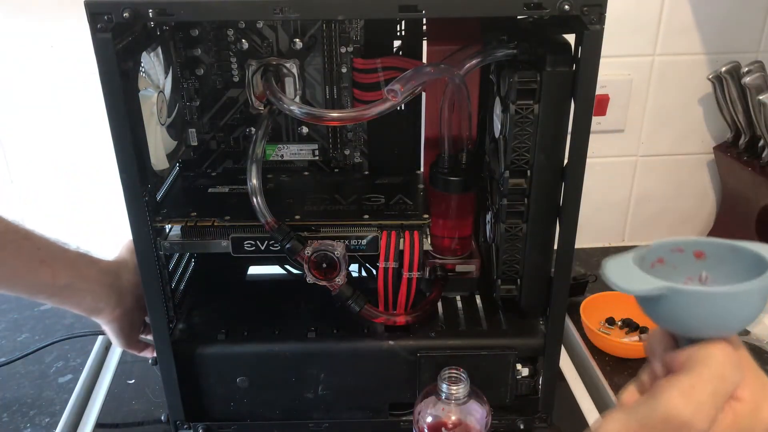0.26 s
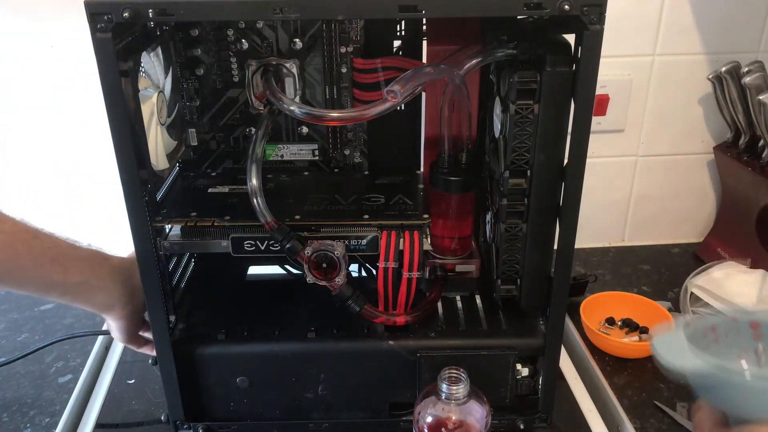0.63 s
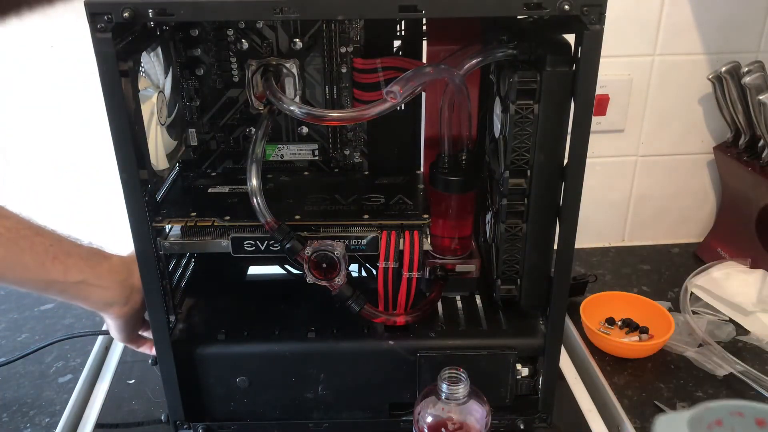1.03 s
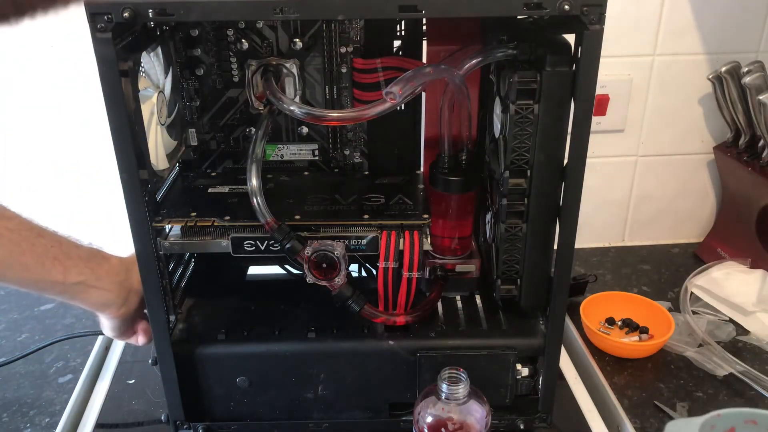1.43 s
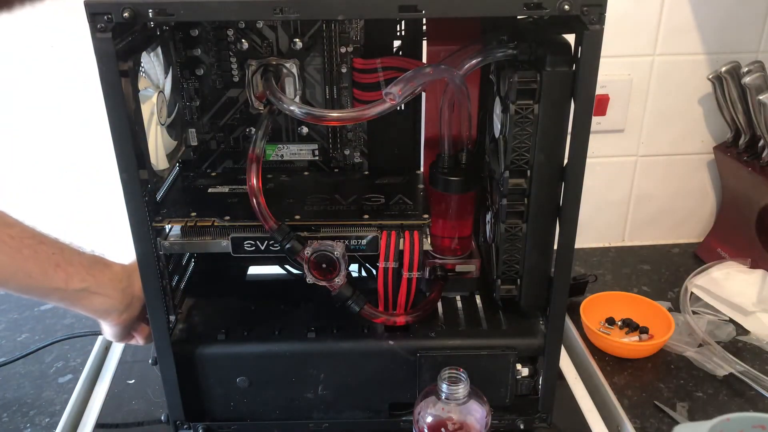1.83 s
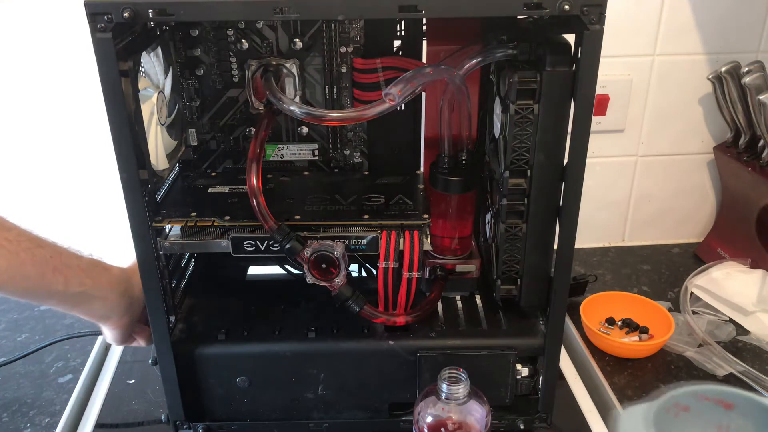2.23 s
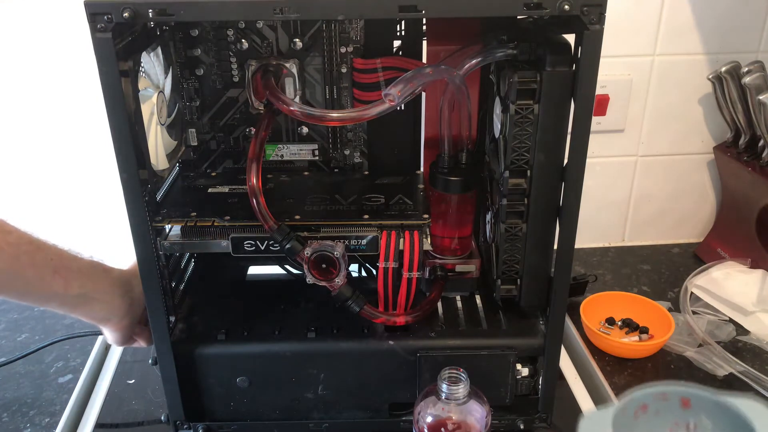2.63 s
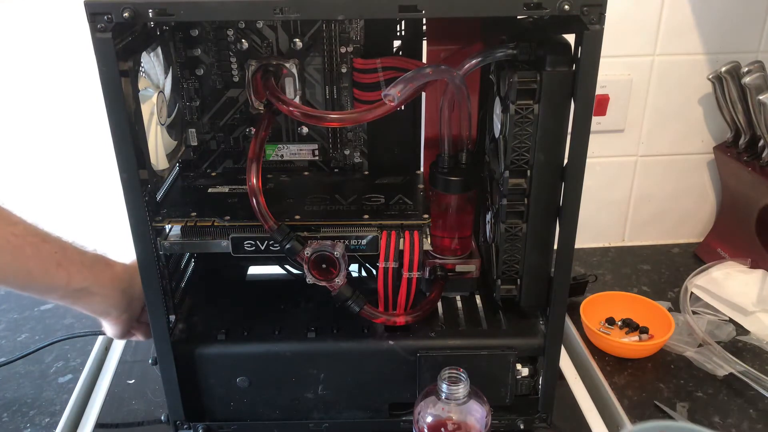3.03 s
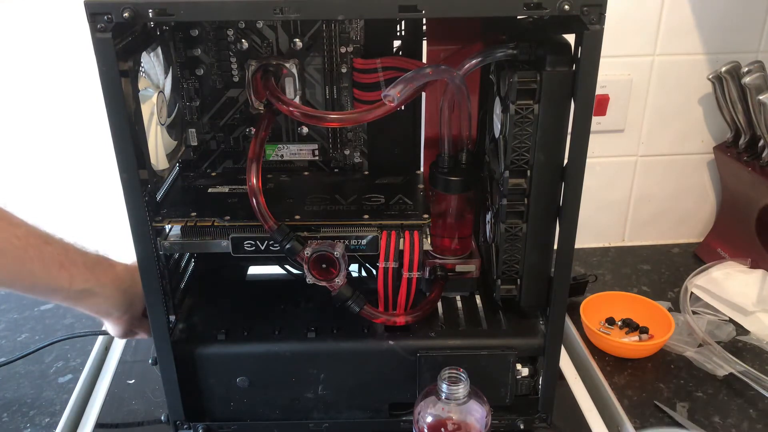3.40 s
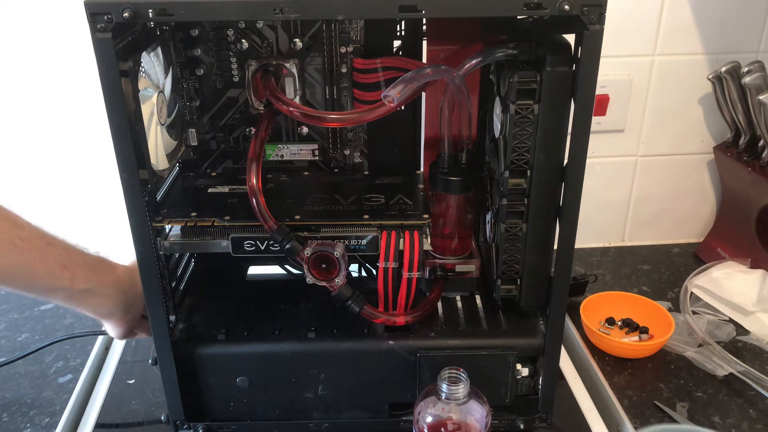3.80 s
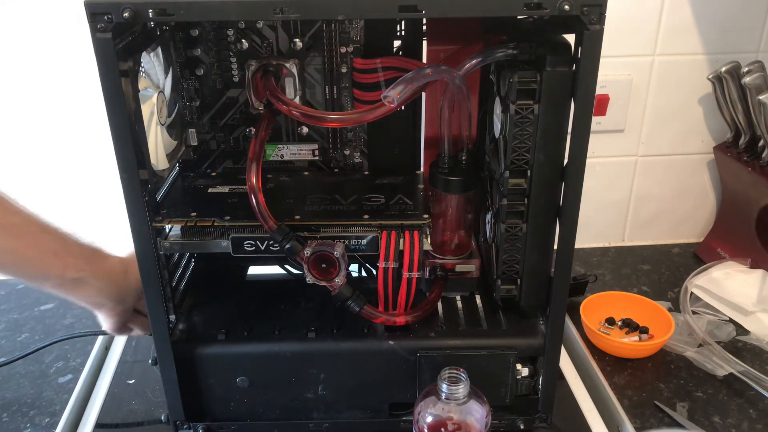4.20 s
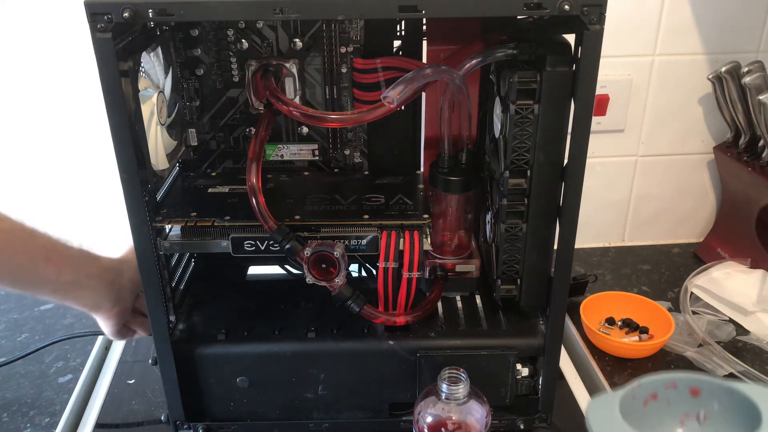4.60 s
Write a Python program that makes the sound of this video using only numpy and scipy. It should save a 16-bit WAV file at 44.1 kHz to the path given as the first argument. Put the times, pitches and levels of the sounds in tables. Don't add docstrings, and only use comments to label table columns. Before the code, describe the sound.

A switch snaps, hollow plastic knocks and rocks on a counter, then a small pump crackles with air bubbles, snaps off and rattles to a stop.

```python
import sys
import numpy as np
from scipy import signal
from scipy.fft import rfft, irfft, next_fast_len
from scipy.io import wavfile
from scipy.ndimage import map_coordinates

SR = 44100
rng = np.random.default_rng(int(sys.argv[2]) if len(sys.argv) > 2 else 0)


def volts_from_db(level):
    exponent = np.asarray(level, float) / 20
    return 10 ** exponent


def wav_out(sig):
    wavfile.write(sys.argv[1], SR, np.round(np.clip(np.atleast_2d(sig).T, -1, 1) * 32767).astype(np.int16))


N = 213976

# time [s], churn level [dB], slosh in the reservoir [dB].
CHURN_COURSE = [(1.7, -71.5, 8.5), (2.02, -65, 5.5), (2.09, -58, 2), (2.22, -58, 2), (2.26, -54, 4.5),
                (2.36, -58.5, -3), (2.5, -52, 4), (2.71, -48, 1.5), (2.8, -48.5, -1), (3.21, -46, -0.5),
                (3.57, -44.5, -2), (3.8, -44, 1), (4.1, -43, 1.5), (4.2, -39.5, 2.5), (4.316, -39.5, -10),
                (4.47, -43.5, -6.5), (4.62, -59.5, -7), (4.85, -70.5, -6)]
# centre [Hz], width [Hz], level [dB].
HOUSING_MODES = [(1033, 120, -8.5), (1570, 410, -6), (1930, 200, 0.5), (2160, 290, -2.5), (2960, 130, 3),
                 (3270, 100, 2.5), (3540, 220, -2), (4380, 270, -1)]


def unit(x):
    return x / np.sqrt(np.mean(x ** 2) + 1e-20)


def along(points, hz):
    f, v = np.transpose(points)
    return np.interp(np.log(hz + 1), np.log(f + 1), v)


def ramp(times_s, values):
    return np.interp(np.arange(N) / SR, times_s, values)


def curves(rows):
    s, *cols = np.transpose(rows)
    return [ramp(s, c) for c in cols]


def wobble(rate):
    knots = rng.standard_normal(int(N * rate / SR) + 4)
    return map_coordinates(knots, [np.arange(N) * rate / SR])


def filtered(x, response):
    m = next_fast_len(len(x) + 8192)
    return irfft(rfft(x, m) * response(np.fft.rfftfreq(m, 1 / SR)), m)[:len(x)]


def modes(table):
    def response(f):
        total = 0
        for k, (c, w, db) in enumerate(table):
            total = total + (-1) ** k * volts_from_db(db) * 1j * f * w / (c * c - f * f + 1j * f * w)
        return total
    return response


def steep(table):
    return lambda f: sum(volts_from_db(db) * modes([(c, 1.55 * w, 0)])(f) ** 2 for c, w, db in table)


def causal(spectrum):
    def response(f):
        cep = irfft(np.log(volts_from_db(along(spectrum, f)) + 1e-6))
        cep[1:len(f) - 1] *= 2
        cep[len(f):] = 0
        return np.exp(rfft(cep))
    return response


def roomy(x, wet_db, drive=None):
    # frequency [Hz], t60 [s].
    kitchen_t60 = [(200, 0.25), (1000, 0.35), (3000, 0.32), (6000, 0.32), (10000, 0.27), (16000, 0.2)]
    hz, t, z = signal.stft(rng.standard_normal(SR // 3), SR, nperseg=256)
    decay = volts_from_db(-60 * t / along(kitchen_t60, hz)[:, None])
    tail = signal.istft(z * decay, SR, nperseg=256)[1]
    tail = np.pad(tail / np.linalg.norm(tail), (round(.004 * SR), 0))
    wet = signal.fftconvolve(x if drive is None else drive, tail)
    return np.pad(x, (0, len(tail) - 1)) + volts_from_db(wet_db) * wet


def add(track, s, piece):
    part = track[round(s * SR):][:len(piece)]
    part += piece[:len(part)]


def puff(t60, rise=0.00021):
    t = np.arange(SR // 8) / SR
    burst = rng.standard_normal(SR // 8) * volts_from_db(-60 * t / t60) * (1 - np.exp(-t / rise))
    return burst / np.linalg.norm(burst)


def grains(per_s, spread_db, clump):
    draw = rng.random((N, 3))
    hit = draw[:, 0] < per_s / SR * np.exp(clump * wobble(30))
    size = volts_from_db(np.minimum(-spread_db * np.log(draw[:, 2]), 9))
    return unit(hit * np.sign(draw[:, 1] - .5) * size)


def bubbles(per_s, centre_hz, octaves, cycles, spread_db):
    at = np.flatnonzero(rng.random(N) < per_s / SR * np.exp(.45 * wobble(35)))
    draw, t = rng.random((len(at), 2)), np.arange(220) / SR
    hz = np.clip(centre_hz * 2 ** (octaves * rng.standard_normal(len(at))), 600, 13500)[:, None]
    size = volts_from_db(np.minimum(-spread_db * np.log(draw[:, :1]), 12))
    envelope = np.exp(-t * hz / cycles) * (1 - np.exp(-t * hz))
    wave = size * np.sin(2 * np.pi * hz * t * (1 + 20 * t)) * envelope
    place = at[:, None] + np.arange(220)
    return unit(np.bincount(place.ravel(), wave.ravel(), N + 220)[:N])


def fine_foam(knocks):
    # frequency [Hz], level [dB per Hz].
    foam_colour = [(2650, -9.5), (4500, -4.5), (5060, -8), (6460, -5.5), (6920, -6.5), (7650, -12.5),
                   (9070, -10), (10600, -14.5), (13700, -18.5), (14900, -18.5), (16000, -37.5)]
    fade_s = (4.52, 4.65)
    spray = bubbles(per_s=630, centre_hz=7600, octaves=0.483, cycles=2.0, spread_db=5.5)
    spit = 0.35 * knocks + 0.5 * spray + rng.standard_normal(N)
    fizz = unit(roomy(filtered(spit, causal(foam_colour)), wet_db=-11.0)[:N])
    lone = bubbles(per_s=45, centre_hz=10000, octaves=0.48, cycles=9, spread_db=3.5)
    return volts_from_db(-5 + ramp(fade_s, [0, -11])) * (fizz + 0.16 * lone)


def reservoir(churn_db, slosh_db):
    # centre [Hz], width [Hz], level [dB].
    chamber_modes = [(535.3, 68, 0.5), (920, 270, -13.5)]
    # centre [Hz], width [Hz], level [dB].
    neck_modes = [(656, 71, 0)]
    # centre [Hz], width [Hz], level [dB].
    panel_modes = [(90.6, 26, 3.5), (174, 58, -13.5)]
    drain_s = (3.4, 3.8)
    gulp_db = 2.5 * wobble(11)
    chamber_db = -21.5 + .8 * churn_db + slosh_db - 0.28 * gulp_db
    inlet_db = -36 + .6 * churn_db + 0.14 * slosh_db + gulp_db
    stir = volts_from_db(0.57 * wobble(25)) * rng.standard_normal(N)
    drained = ramp(drain_s, [0, .65]) * unit(filtered(stir, modes([(498, 26, 0)])))
    slosh = unit(filtered(stir, steep(chamber_modes))) + drained
    boom = unit(filtered(volts_from_db(2.4 * wobble(21)) * rng.standard_normal(N), modes(panel_modes)))
    gurgle = unit(filtered(volts_from_db(3.2 * wobble(22.06)) * rng.standard_normal(N), steep(neck_modes)))
    return volts_from_db(inlet_db + 2.5) * gurgle + volts_from_db(chamber_db + 0.2) * slosh + volts_from_db(0.64 * chamber_db - 33) * boom


def flow():
    churn_db, slosh_db = curves(CHURN_COURSE)
    knocks = grains(per_s=800, spread_db=1.5, clump=.45) + 0.64 * rng.standard_normal(N)
    pockets = bubbles(per_s=400, centre_hz=2940, octaves=0.48, cycles=2.2, spread_db=1.5)
    housing = unit(filtered(knocks, modes(HOUSING_MODES)))
    crackle = unit(roomy(housing + 0.535 * pockets, wet_db=-2.5)[:N])
    torn = volts_from_db(churn_db) * (volts_from_db(-3.0) * crackle + fine_foam(knocks))
    return ramp([1.6, 1.75], [0, 1]) * (torn + reservoir(churn_db, slosh_db))


def pops():
    # time [s], peak [dB], ring [Hz].
    thuds = [
        (0.086, -49.5, 157),
        (0.714, -51, 212),
        (1.227, -56, 410),
        (1.425, -49.5, 446),
        (1.78, -60, 70.5),
        (2.235, -57, 91),
        (2.63, -56.5, 90),
        (2.74, -58, 99),
        (3.23, -60, 86),
        (3.85, -54, 160),
    ]
    # time [s], peak [dB], ring [Hz].
    first_ticks = [(1.404, -46, 5500), (1.4235, -42, 2330), (1.4242, -37.5, 5920), (1.4255, -42.5, 3740),
                   (1.638, -52, 2200), (1.642, -48, 5760), (1.71, -58, 11000), (1.791, -58, 3270),
                   (1.862, -52, 8260), (1.92, -56, 1990), (1.966, -59, 8900)]
    # time [s], peak [dB], ring [Hz].
    large_pockets = [(1.9818, -48, 4260), (2.0184, -48, 3560), (2.039, -47, 3420), (2.089, -46, 2450),
                     (2.1339, -36.5, 2080), (2.204, -45, 6400), (2.2296, -42, 4380), (2.2686, -48, 3200),
                     (2.3081, -48, 4600), (2.4216, -43, 3020), (2.4451, -42.5, 2160), (2.459, -39.5, 4500),
                     (2.4975, -42.5, 1670), (2.5331, -36, 3000), (2.6455, -39.5, 2990), (2.68, -39.5, 1930),
                     (2.706, -37.5, 3040), (2.7523, -35.5, 2090), (2.7664, -37.5, 4500),
                     (2.875, -38.5, 3130), (3.0114, -34, 2960), (3.0291, -36, 3180), (3.083, -39, 3040),
                     (3.1738, -38.5, 2000), (3.2044, -38, 2140), (3.258, -37, 2900), (3.3175, -41, 4350),
                     (3.361, -31, 3130), (3.749, -36, 5700), (3.7755, -37, 6500)]
    # time [s], peak [dB], ring [Hz].
    coasting_knocks = [(4.1993, -28.5, 3990), (4.2144, -35, 2100), (4.3113, -32.5, 2960),
                       (4.3893, -29.5, 4570), (4.4182, -33.5, 3040), (4.459, -36, 6100),
                       (4.5343, -53, 6050), (4.5892, -59, 5800), (4.6591, -49.5, 3780), (4.761, -44, 3670),
                       (4.762, -51, 5260), (4.789, -49.5, 4335), (4.8444, -47.5, 2910)]
    # time [s], peak [dB].
    dull_bursts = [
        (2.0184, -50),
        (2.3083, -47),
        (2.378, -49),
        (2.5329, -48),
        (2.601, -49),
        (2.7525, -44),
        (2.9232, -41.5),
        (3.7751, -43),
        (3.797, -43),
    ]
    crack_share = 0.39
    out, churn_db = np.zeros(N), curves(CHURN_COURSE)[0]

    def splash(f):
        return modes([(5000, 7500, 0)])(f) ** 4 + .8 * modes(HOUSING_MODES)(f)

    for s, db, hz in thuds + first_ticks + large_pockets + coasting_knocks:
        ring = filtered(puff(0.022, rise=0.0015), lambda f: modes([(hz, .2 * hz, 0)])(f) ** 2)
        crack = filtered(puff(0.0086), splash) * (hz > 1000)
        crack_db = 7.5 + (1 - crack_share) * (churn_db[round(s * SR)] - db)
        pop = ring / np.abs(ring).max() + volts_from_db(crack_db) * crack / (np.abs(crack).max() + 1e-9)
        add(out, s, volts_from_db(db - 1) * roomy(pop, wet_db=-3.5))
    for s, db in dull_bursts:
        crack = filtered(puff(0.01), steep([(5400, 4700, 0)]))
        add(out, s, volts_from_db(db + 7.5) * roomy(crack / np.abs(crack).max(), wet_db=-6))
    return out


def rotor():
    # centre [Hz], width [Hz], level [dB].
    bearing_modes = [(5700, 630, 3), (6600, 530, 1), (7050, 390, -4), (9500, 520, -17)]
    # time [s], level [dB].
    kicks = [
        (4.534, -64),
        (4.66, -63),
        (4.762, -62),
    ]
    t, loudest_s = np.arange(N) / SR, 4.468
    swell_db, stall_db = 35 * (loudest_s - t), 169 * (t - loudest_s)
    loose = volts_from_db(-41 - np.maximum(swell_db, stall_db)) * ramp([4.27, 4.36], [0, 1])
    for s, db in kicks:
        loose = loose + (t > s) * volts_from_db(db - 60 * np.abs(t - s) / 0.098)
    chatter = grains(per_s=570, spread_db=14, clump=0.78) + 0.27 * rng.standard_normal(N)
    rattle = unit(roomy(filtered(chatter, modes(bearing_modes)), wet_db=-4.5)[:N])
    return loose * volts_from_db(-3.5) * rattle


def hum(table, start_s, stop_s, cog_depth=0):
    hz, db = curves(table)
    t = np.arange(N) / SR
    gate = ramp([start_s - .03, start_s, stop_s, stop_s + .04], [0, 1, 1, 0])
    cog = 1 + cog_depth * np.cos(2 * np.pi * 14 * (t - 1.536))
    turn = 2 * np.pi * np.cumsum(hz) / SR
    return gate * cog * volts_from_db(db + 0.62 * wobble(29.57)) * (np.sin(turn) + 0.034 * np.sin(2 * turn))


def windings():
    # time [s], pitch [Hz], level [dB].
    groan = [
        (1.42, 161.2, -65),
        (1.536, 205.4, -53),
        (1.614, 241.5, -52),
        (1.68, 233.5, -55.5),
        (1.76, 230, -70),
    ]
    # time [s], pitch [Hz], level [dB].
    rundown = [
        (4.25, 291, -90),
        (4.32, 300.6, -57),
        (4.5, 296, -67.5),
        (4.7, 291, -74),
        (4.76, 295, -89),
    ]
    return hum(groan, 1.41, 1.75, cog_depth=0.68) + hum(rundown, 4.25, 4.76)


def supply():
    # frequency [Hz], level [dB].
    coil_squeal = [(1600, -74), (5210, -77), (5600, -85), (6000, -80.5), (6400, -88.5), (8400, -79)]
    t, squeal = np.arange(N) / SR, np.zeros(N)
    for hz, db in coil_squeal:
        squeal += volts_from_db(db + 2 * wobble(60)) * np.sin(2 * np.pi * hz * t + .8 * wobble(60))
    charging = ramp([1.11, 1.13, 1.22, 1.27], [0, 1, 1, 0])
    return charging * squeal + volts_from_db(-87) * np.sin(2 * np.pi * 10492 * t)


def driver():
    # time [s], level [dB], load [0-1].
    whistle = [
        (1.45, -100, 0),
        (1.47, -69.5, 0.5),
        (1.7, -64.5, 0.4),
        (2.03, -61, 0.3),
        (2.15, -63, 0.7),
        (2.62, -65, .85),
        (2.75, -76, .5),
        (3.0, -61, .4),
        (3.2, -76, .6),
    ]
    # time [s], level [dB].
    octave = [
        (1.46, -100),
        (1.49, -73),
        (2.2, -81),
        (2.4, -92),
        (2.7, -78),
        (3.12, -76),
        (3.3, -95),
    ]
    whistle_db, load = curves(whistle)
    load = np.clip(load, 0, 1)
    awake_s = np.arange(N) / SR - whistle[0][0]
    clock = 2 * np.pi * np.cumsum(7632 - 9 * awake_s) / SR
    carrier = clock + (.55 + .9 * load) * wobble(260)
    step = 2 * np.pi * np.cumsum(62 + 172 * awake_s) / SR + .9 * wobble(90)
    main = (1 - 0.63 * load) * volts_from_db(4 * wobble(30)) * np.sin(carrier)
    side = load * volts_from_db(4 * wobble(30)) * (np.sin(clock + step) + 0.3 * np.sin(clock - step))
    first = (main + side) * volts_from_db(whistle_db) * ramp([3.2, 3.4], [1, 0])
    second = volts_from_db(curves(octave)[0] + 4 * wobble(30)) * np.sin(2 * clock + .45 * wobble(120))
    return first + second


def snap(contacts, tone, wet_db):
    out, colour = np.zeros(N), causal(tone)
    even = filtered(signal.unit_impulse(SR // 8), colour)
    for s, db in contacts:
        direct = 0.41 * even + filtered(puff(0.011), colour)
        add(out, s, volts_from_db(db + 20.5) * roomy(direct, wet_db, even))
    return out


def switch():
    # time [s], level [dB].
    on_contacts = [
        (.048, -53.5),
        (.052, -58.5),
        (.0712, -8),
        (.0742, -9.5),
        (.0726, -21.5),
        (.078, -21.5),
    ]
    # time [s], level [dB].
    off_contacts = [
        (4.0045, -19.5),
        (4.006, -11),
        (4.0082, -10.5),
    ]
    # frequency [Hz], level [dB per Hz].
    on_colour = [(88, -59), (150, -20), (589, -22.5), (1140, -10), (1530, -17.5), (1900, -8.5), (2700, -12),
                 (3770, -5), (4410, -8), (6510, 4), (7770, -7.5), (10600, -12), (11900, -10), (16000, -18)]
    # frequency [Hz], level [dB per Hz].
    off_colour = [(180, -21), (300, -33), (774, -10), (1010, -6.5), (1140, -7), (1970, -12.5), (2250, -3),
                  (3760, 4), (4090, 1.5), (7440, -2.5), (10600, -16), (14000, -14.5), (16000, -16)]
    return snap(on_contacts, on_colour, wet_db=0) + snap(off_contacts, off_colour, wet_db=-1.0)


def funnel():
    # time [s], level [dB], hardness [dB], bowl note [Hz], contact t60 [s].
    taps = [(.31, -51, -10, 1180, 0.064), (.444, -50, -19, 1170, 0.046), (.492, -39, -14, 1210, 0.051),
            (.706, -42.5, -2, 1220, 0.025), (.738, -41, -19, 1275, 0.11), (.752, -40, -20, 1200, .097),
            (.766, -41.5, -18, 1203, 0.054), (.787, -48, -25.5, 1240, 0.038), (.979, -59, -20, 1316, 0.035),
            (1.238, -37.5, -20, 1385, .047), (1.262, -38, -25, 1235, 0.15), (1.292, -47, -17, 1410, 0.14),
            (1.404, -38.5, -21, 1207, 0.046), (1.466, -49.5, -10.5, 1350, 0.073),
            (1.55, -50, -25, 1100, 0.13)]
    # centre [Hz], width [Hz], level [dB].
    upper_modes = [(682, 120, -1), (1860, 210, -7), (2450, 220, -6.5), (2820, 180, -8.5), (4090, 590, -16)]
    out = np.zeros(N)
    for s, db, edge_db, hz, t60 in taps:
        over_db = 7 + 0.54 * edge_db
        bowl = [(hz, 95, 2.5)]
        bowl += [(c, w, g + over_db + rng.normal(0, 0.81)) for c, w, g in upper_modes]
        body = filtered(puff(t60, rise=0.0014), steep(bowl))
        rim = filtered(puff(t60 / 2), modes([(5060, 2900, edge_db - 7)]))
        rim = filtered(rim, modes([(4950, 4100, 0.0031)]))
        add(out, s, volts_from_db(db + 34.5) * roomy(body + rim, wet_db=-1))
    return out


def quiet_air():
    # frequency [Hz], level [dB per Hz].
    air_colour = [(12, -49), (20, -3), (77, -3), (399, -7.5), (472, -12.5), (607, -10), (1330, -17.5),
                  (3250, -21), (4940, -27.5), (5850, -23.5), (7730, -28.5), (12800, -31), (16000, -36)]
    hiss = filtered(rng.standard_normal(N), lambda f: volts_from_db(along(air_colour, f)))
    return volts_from_db(-62 + 1.7 * wobble(4.4)) * unit(hiss)


def scene():
    pump = flow() + pops() + rotor() + windings()
    electronics = supply() + driver()
    return (pump + electronics + switch() + funnel() + quiet_air())[None]


def low_pass(x):
    return signal.sosfilt(signal.butter(12, 16470, fs=SR, output="sos"), x)


def record(dry):
    mix = filtered(dry[0], lambda hz: hz < 15750)[None]
    return low_pass(mix)


dry = scene()
out = record(dry)
wav_out(out)
```